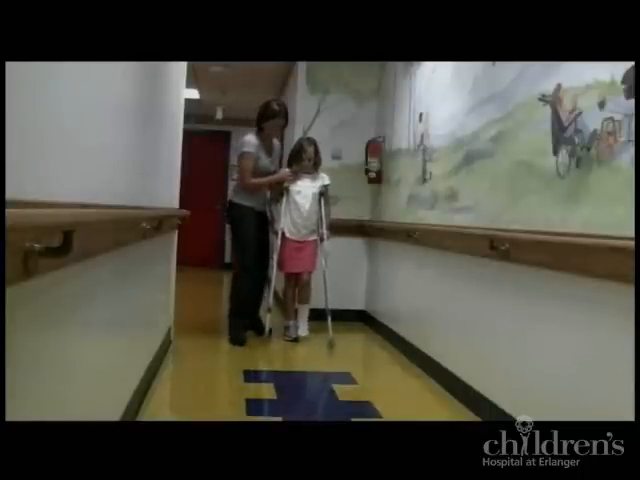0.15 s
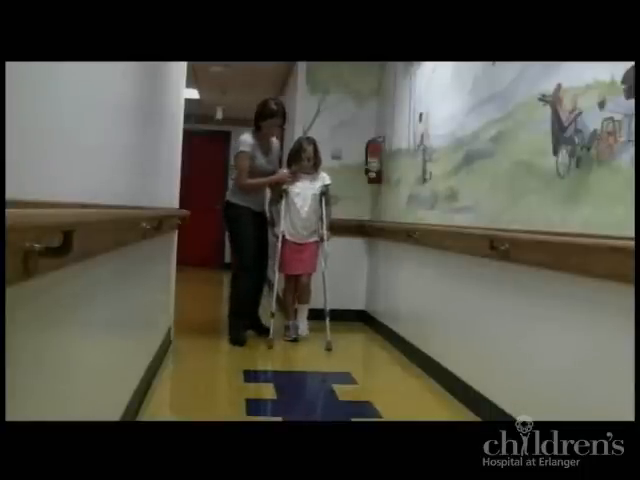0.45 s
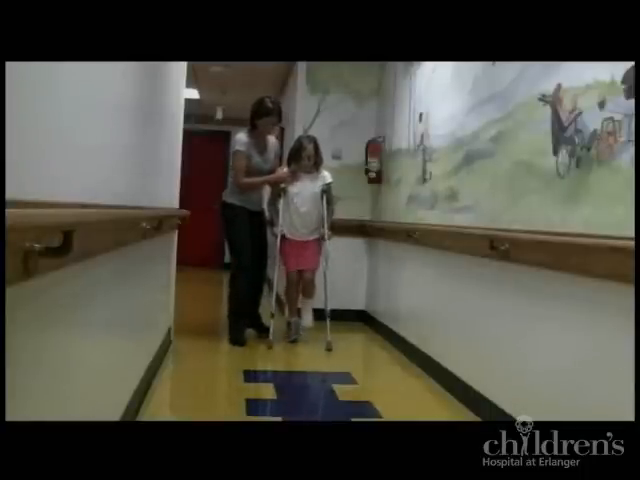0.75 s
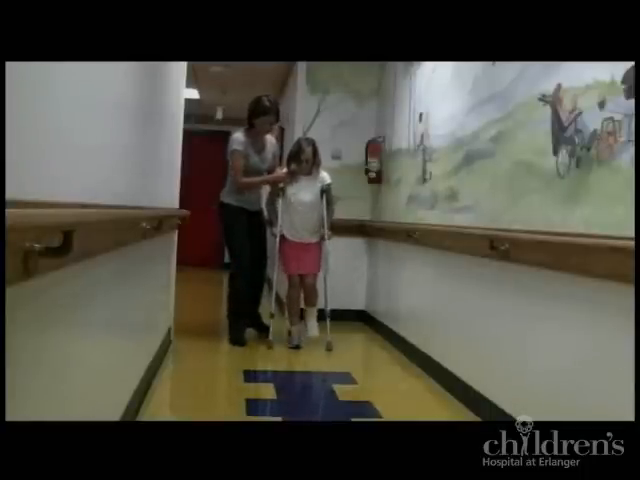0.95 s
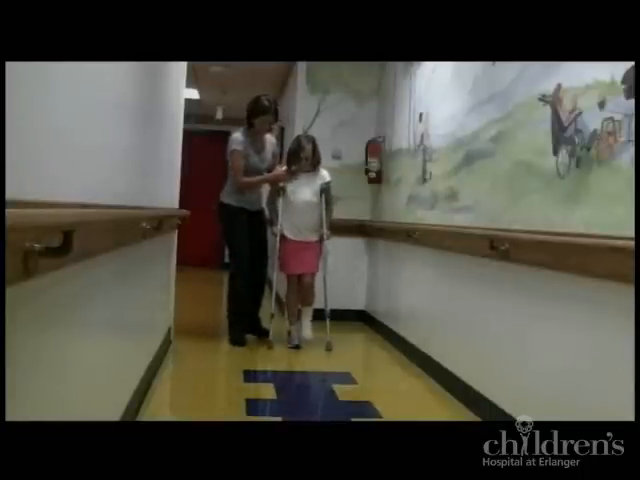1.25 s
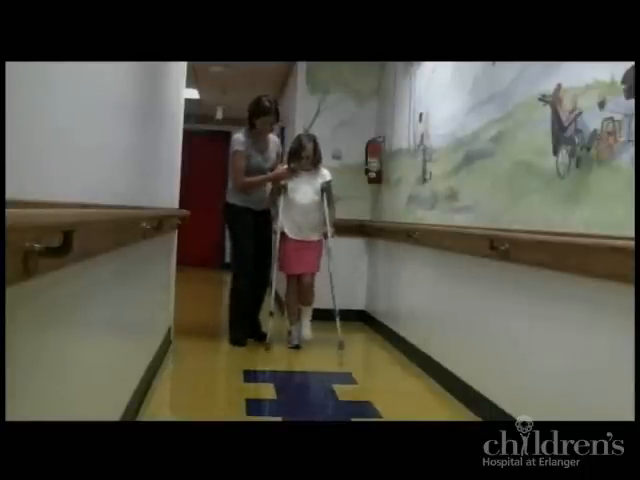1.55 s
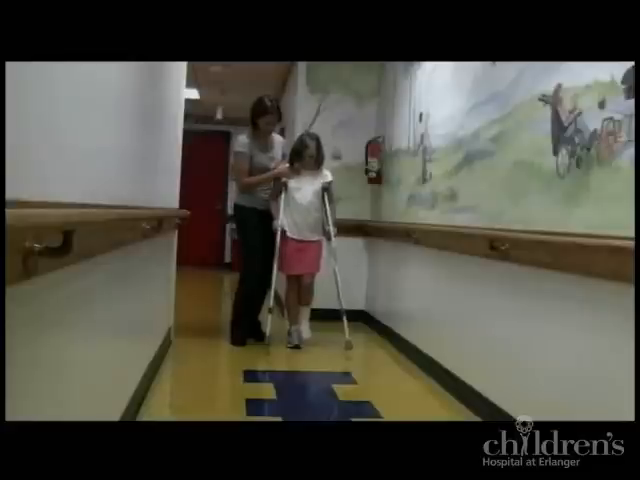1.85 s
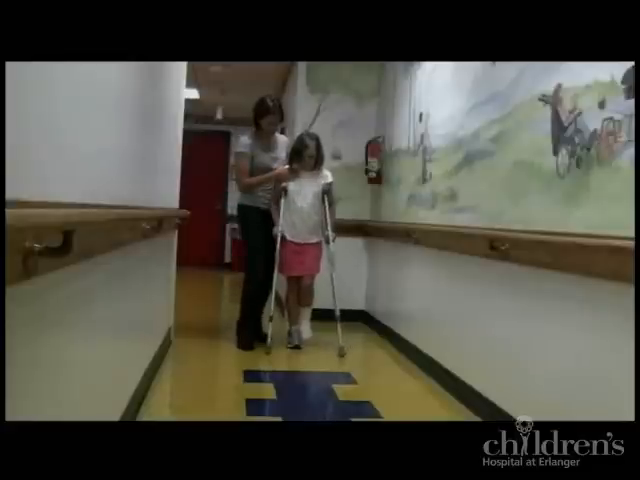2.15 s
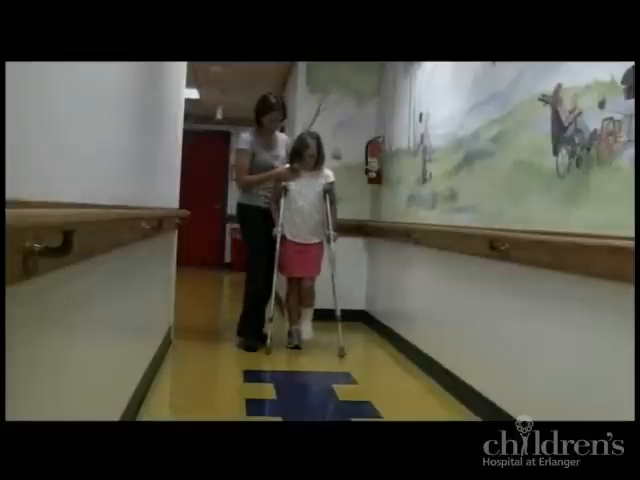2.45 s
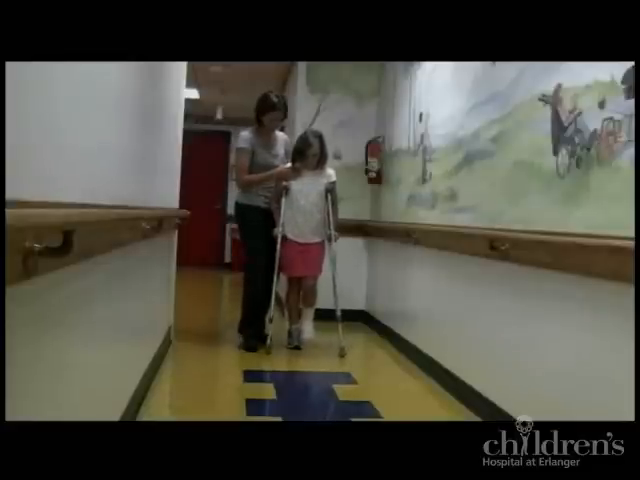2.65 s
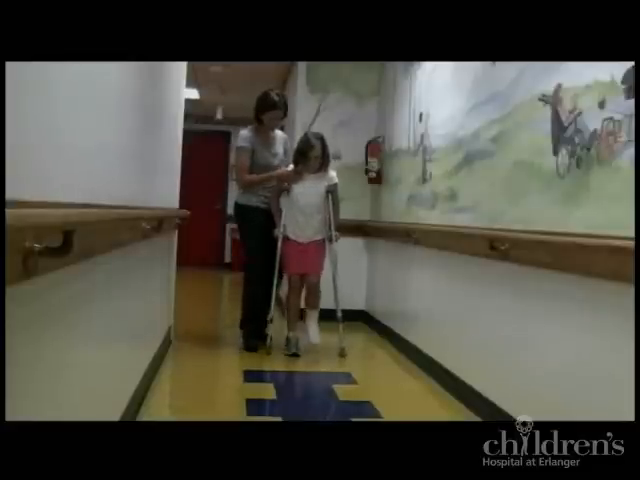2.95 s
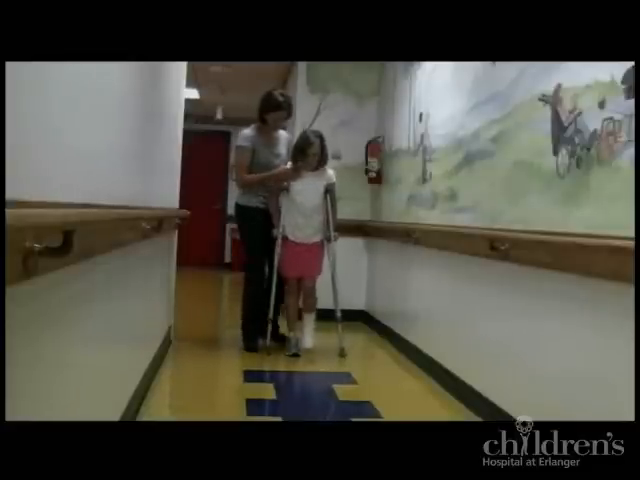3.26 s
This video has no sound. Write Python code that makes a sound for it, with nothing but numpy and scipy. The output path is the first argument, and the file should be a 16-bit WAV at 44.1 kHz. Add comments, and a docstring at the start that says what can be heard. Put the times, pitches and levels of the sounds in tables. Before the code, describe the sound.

Metal crutches clack and thud on a hard corridor floor over a faint ventilation hum.

```python
"""Two rubber crutch tips thud on a hard corridor floor, with loose joints and shoes clacking between.
A child walks slowly on metal crutches, a helper beside her; one microphone stands down the corridor.
Thuds and clacks are bursts of gritty noise, coloured by resonances; a thump and floor boom add low sines.
Cloth rustles as sparse noise grains and soles squeak as gliding tones, each with the corridor around it.
Behind them lie shaped ventilation noise and two wavering hum tones."""
import sys
import numpy as np
from scipy import signal
from scipy.fft import rfft, irfft
from scipy.io import wavfile
from scipy.ndimage import uniform_filter1d

SR = 44100
rng = np.random.default_rng(int(sys.argv[2]) if len(sys.argv) > 2 else 0)


def bounce(signal):
    """Save signal as a 16-bit WAV file at the path given by the first command-line argument."""
    frames = np.transpose(np.atleast_2d(signal))
    limited = np.clip(frames, -1, 1)
    pcm = np.round(limited * 32767).astype(np.int16)
    wavfile.write(sys.argv[1], SR, pcm)


N = 149940  # length in samples, 3.4 s


def amp(db):
    """Decibels to gain."""
    return 10 ** (np.asarray(db) / 20)


def unit(x):
    """Scales to rms 1."""
    return x / np.sqrt(np.mean(x ** 2) + 1e-20)


def read(points, hz):
    """Reads a table on a log-frequency axis."""
    f, value = np.transpose(points)
    return np.interp(np.log(hz + 1), np.log(f + 1), value)


def add(mix, start_s, sound):
    """Mixes a sound in at a time, cutting what runs past the end."""
    part = mix[max(round(start_s * SR), 0):][:len(sound)]
    part += sound[:len(part)]


def bins(size=4096):
    """Frequencies of the filter grid, in Hz."""
    return np.fft.rfftfreq(size, 1 / SR)


def colour(x, gain):
    """Minimum-phase filter with the given gain on the filter grid, so nothing sounds before its cause."""
    both_sides = np.r_[gain, gain[-2:0:-1]]
    log_gain = np.log(np.maximum(both_sides, 1e-5))
    taps = np.fft.ifft(np.exp(np.conj(signal.hilbert(log_gain)))).real
    return signal.fftconvolve(x, taps[:len(gain)])


def peak(hz, width_hz):
    """Gain of one resonance on the filter grid."""
    return 1 / np.sqrt(1 + (2 * (bins() - hz) / width_hz) ** 2)


def drift(size, rate_hz):
    """Slow random wander of rms 1."""
    hz = np.fft.rfftfreq(size, 1 / SR)
    spectrum = rfft(rng.standard_normal(size)) * np.exp(-(hz / rate_hz) ** 2)
    return unit(irfft(spectrum, size))


def evenly(x, envelope, count=6):
    """Shapes noise by an envelope while keeping its spectrum even; energy 1."""
    for _ in range(count):
        z = rfft(x * envelope)
        x = irfft(z / (abs(z) + 1e-12), len(x))  # flat spectrum
        x = x / np.sqrt(abs(uniform_filter1d(x ** 2, size=64)) + 1e-30)  # flat level
    shaped = x * envelope
    return shaped / np.linalg.norm(shaped)


def contact(length_s, rise_s, fall_s, size=2048):
    """A gritty burst of tiny impacts as two surfaces settle against each other."""
    t = np.arange(size) / SR
    envelope = (1 - np.exp(-t / rise_s)) * np.exp(-np.maximum(t - length_s, 0) / fall_s)
    grit = amp(3 * drift(size, 515))  # level wanders by 3 dB rms, up to about 515 Hz
    return evenly(rng.standard_normal(size), envelope * grit)


# how long the corridor rings in each band: pitch_hz, t60_s (time to fall 60 dB)
CORRIDOR_T60 = [(150, 0.97), (500, 0.63), (1500, 0.47), (4000, 0.37), (8000, 0.38), (12000, 0.36)]
EARLY_T60_S = 0.16
EARLY_DB, TAIL_DB, DIRECT_DB = -0.5, -8.5, -4.5


def corridor(x, size=32768):
    """Direct sound, dense reflections from the near walls, and a tail whose decay depends on pitch."""
    t = np.arange(size) / SR
    near_walls = (1 - np.exp(-t / 0.00097)) * amp(-60 * t / EARLY_T60_S)
    early = evenly(rng.standard_normal(size), near_walls, count=1)
    hz, when_s, z = signal.stft(rng.standard_normal(size), SR, nperseg=256)
    decay = amp(-60 * when_s / read(CORRIDOR_T60, hz)[:, None])
    tail = signal.istft(z * decay, SR)[1][:size] * (1 - np.exp(-t / 0.014))
    response = amp(EARLY_DB) * early + amp(TAIL_DB) * tail / np.linalg.norm(tail)
    response[0] += amp(DIRECT_DB)
    return signal.fftconvolve(x, response)


# spectrum shape of the ventilation: pitch_hz, level_db (relative)
AIR_COLOUR = [(15, -56), (25, -15), (64, -12), (102, -5), (211, 0), (364, -6.5), (485, -4), (953, -13.5),
              (1140, -18.5), (1560, -22), (2990, -31), (4900, -31), (12500, -40.5), (16200, -73),
              (22000, -120)]
AIR_DB = -48.5  # rms


def ventilation():
    """Steady air noise, random in phase and weighted towards the lows."""
    gain = amp(read(AIR_COLOUR, np.fft.rfftfreq(N, 1 / SR)))
    return amp(AIR_DB) * unit(irfft(rfft(rng.standard_normal(N)) * gain, N))


# mains hum of the building: pitch_hz, level_db (rms before the waver)
HUM_TONES = [(120, -54.5), (240, -56)]


def hum():
    """Steady mains tones, each wavering slightly in level."""
    t = np.arange(N) / SR
    sound = np.zeros(N)
    for hz, db in HUM_TONES:
        waver = 1 + 0.13 * drift(N, 8.1)
        sound += amp(db) * np.sqrt(2) * waver * np.sin(2 * np.pi * (hz * t + rng.random()))
    return sound


# rise and fall of the rustle: start_s, level_db
RUSTLE_LEVEL = [(0, -47.5), (0.159, -74), (.25, -70), (.36, -64.5), (.62, -53.5), (.80, -55), (.86, -45.5),
                (.91, -51), (.97, -59), (1.3, -60.5), (1.72, -72.5), (1.88, -57), (2.04, -57), (2.17, -66),
                (2.55, -60), (2.72, -56), (2.849, -54.5), (2.92, -49), (3.02, -56.5), (3.4, -67)]
# colour of cloth and soles: pitch_hz, level_db (relative)
CLOTH_COLOUR = [(200, -14.5), (700, 7), (1200, 8), (2000, 3.5), (3200, 3.5), (5000, -4.5), (8000, -7.5),
                (12000, -18)]
GRAINS_PER_S, GRAIN_SPREAD_DB = 2500, 2.5


def rustle():
    """Sparse random grains of cloth and sliding soles, swelling as the legs swing."""
    present = rng.random(N) < GRAINS_PER_S / SR
    strength = amp(GRAIN_SPREAD_DB * np.minimum(rng.exponential(1, N), 4))
    grains = rng.standard_normal(N) * strength * present
    sound = unit(corridor(colour(grains, amp(read(CLOTH_COLOUR, bins()))))[:N])
    return sound * amp(np.interp(np.arange(N) / SR, *np.transpose(RUSTLE_LEVEL)))


# faint squeaks of the soles: start_s, length_s, start_hz, end_hz, level_db
SOLE_SQUEAKS = [(0.648, .11, 1080, 1178, -60), (.70, 0.12, 1458, 1510, -60), (0.812, 0.156, 859, 927, -52)]


def squeak(length_s, start_hz, end_hz, db):
    """A thin wavering tone that glides up, swells and fades, with a little of the corridor around it."""
    u = np.linspace(0, 1, int(length_s * SR))
    glide = start_hz + (end_hz - start_hz) * np.sin(np.pi / 2 * u)
    hz = glide * (1 + 0.023 * drift(len(u), 155))
    swell = np.sqrt(2 * abs(np.sin(np.pi * u)))
    tone = amp(db) * swell * np.sin(2 * np.pi * np.cumsum(hz) / SR)
    sound = amp(-4) * corridor(tone)
    add(sound, 0, tone)
    return sound


# clacks of loose joints and shoes: start_s, level_db (relative), length_s,
# tilt_db (brightness per octave), ring_db (metal), knock_hz, knock_db
JOINT_CLACKS = [(0.3773, -13.5, 0.0039, -1, -11, 1210, 6.5), (0.486, -2, 0.011, 1, -26, 1940, 0.5),
                (0.4988, -4.5, 0.013, -0.5, -24, 4060, 2.5), (1.3693, -1.5, .005, 0.5, -3, 1480, 2.5),
                (2.209, -13.5, 0.0066, -0.5, -27, 1150, 3), (2.233, -18, 0.017, -2.5, 0, 1620, 6),
                (2.2850, -1.5, 0.0054, -0.1, -25, 1190, 3), (2.354, -14.5, 0.0074, -2, -14, 1960, 3),
                (2.3804, -12, 0.0023, 0, -13, 2430, 13)]
# shared colour of a clack: pitch_hz, level_db (relative)
HARD_COLOUR = [(60, -8.5), (400, -5.5), (800, -2), (1200, 0), (2200, 0), (3200, -1), (5000, -1),
               (6000, 0.5), (6600, 0.5), (7400, -4), (9800, -7.5), (10800, -4.5), (12500, -12.5)]
# resonances of the crutch frame: pitch_hz, width_hz, level_db (relative)
FRAME_RINGS = [(1030, 120, 1), (1360, 70, 8), (1615, 60, 12), (2300, 250, 3), (2700, 80, 3),
               (3500, 110, 10), (4820, 170, 9), (6240, 130, 5)]
CLACK_DB, CLACK_RISE_S, CLACK_FALL_S = 9.5, 0.00088, 0.002


def clack(db, length_s, tilt_db, ring_db, knock_hz, knock_db):
    """A short hard chatter with one broad knock, which may also ring the metal frame."""
    ring_power = sum((amp(level + ring_db) * peak(hz, width)) ** 2 for hz, width, level in FRAME_RINGS)
    knock = amp(knock_db) * peak(knock_hz, knock_hz / 5.2)
    octaves = np.log2(np.maximum(bins(), 500) / 3000)
    level_db = CLACK_DB + db + read(HARD_COLOUR, bins()) + tilt_db * octaves
    gain = amp(level_db) * np.sqrt(1 + ring_power + knock ** 2)
    return corridor(colour(contact(length_s, CLACK_RISE_S, CLACK_FALL_S), gain))


# small ticks of clothes and cuffs: start_s, level_db (relative, as for clacks)
CLOTH_TICKS = [(0.002, -31.5), (0.032, -47), (0.086, -30.5), (0.26, -35), (0.288, -32), (0.322, -28.5),
               (0.356, -31), (0.452, -29.5), (0.560, -23.5), (1.795, -34.5), (1.944, -29.5), (2.555, -31.5),
               (2.875, -30.5)]


def tick(db):
    """A faint, dull relative of the clack, with hardly any metal in it."""
    return clack(db, length_s=0.004, tilt_db=-4.3, ring_db=-33, knock_hz=3470, knock_db=2)


# crutch tips landing: start_s, level_db (relative), second_s (second contact, after the first), second_db,
# tube_hz, tube_db, thump_hz, knock_hz, tilt_db (hardness per octave), top_hz (upper band edge), boom_db
TIP_THUDS = [(0.9935, 0, .0060, -5, 2590, 10, 295, 640, -1, 12000, 5),
             (3.0548, 2, .0072, -6.5, 4360, 5, 261.5, 400, -0.22, 9700, 2)]
# shared colour of a landing: pitch_hz, level_db (relative)
LANDING_COLOUR = [(35, -32), (90, -12), (150, -7), (280, 2.5), (420, 3), (800, -1.5), (1200, -4),
                  (2200, -5.5), (3600, -9), (5200, -8.5), (7000, -19.5), (9000, -21.5), (12000, -34.5)]
# low ring of floor and corridor: pitch_hz, level_db (relative), t60_s
FLOOR_BOOM = [(191.3, -28, 0.4), (275, -33, 0.61), (391.3, -32, 0.4), (416, -28, 0.31), (468, -25.5, 0.29),
              (586, -29, 0.32), (742, -26, 0.2), (779, -35, 0.22), (957, -40, 0.43)]
THUD_DB, THUD_FALL_S, TUBE_WIDTH_HZ = 18, 0.0015, 340
THUMP_DB, THUMP_T60_S, LOW_CUT_HZ = -14.5, 0.12, 250


def landing(second_s, second_db, tube_hz, tube_db, knock_hz, tilt_db, top_hz):
    """Two quick contacts knock and shake the tube; each landing has its own tilt and upper band edge."""
    force = np.zeros(SR // 10)
    add(force, 0, contact(0, 0.00029, THUD_FALL_S))
    add(force, second_s, amp(second_db) * contact(0, 0.000547, THUD_FALL_S * 2))
    tube = amp(tube_db) * peak(tube_hz, TUBE_WIDTH_HZ)
    knock = amp(4) * peak(knock_hz, knock_hz / 4.7)
    octaves = np.log2(np.clip(bins(), 300, 2000) / 1000)
    tilt_and_edge = amp(tilt_db * octaves) / np.sqrt(1 + (bins() / top_hz) ** 20)
    resonance = np.sqrt(1 + tube ** 2 + knock ** 2)
    gain = amp(THUD_DB + read(LANDING_COLOUR, bins())) * tilt_and_edge * resonance
    return corridor(colour(force, gain))


def floor_response(size, thump_hz, boom_db):
    """The loaded crutch thumps at one pitch while floor and corridor boom as decaying modes."""
    t = np.arange(size) / SR
    thump = amp(THUMP_DB - 60 * t / THUMP_T60_S) * np.sin(2 * np.pi * thump_hz * t)
    boom = np.zeros(size)
    for hz, level, t60_s in FLOOR_BOOM:
        boom += amp(level - 60 * t / t60_s) * np.sin(2 * np.pi * (hz * t + rng.random()))
    low = thump + amp(boom_db) * boom * (1 - np.exp(-t / 0.014))
    return signal.sosfilt(signal.butter(2, LOW_CUT_HZ, "high", fs=SR, output="sos"), low)


def thud(db, second_s, second_db, tube_hz, tube_db, thump_hz, knock_hz, tilt_db, top_hz, boom_db):
    """One crutch tip landing: the knocking contacts plus the low answer of crutch and floor."""
    sound = landing(second_s, second_db, tube_hz, tube_db, knock_hz, tilt_db, top_hz)
    return amp(db) * (sound + floor_response(len(sound), thump_hz, boom_db))


def scene():
    """All sources at one microphone down the corridor."""
    mix = ventilation() + hum() + rustle()
    events = [(SOLE_SQUEAKS, squeak), (CLOTH_TICKS, tick), (JOINT_CLACKS, clack), (TIP_THUDS, thud)]
    for table, source in events:
        for start_s, *settings in table:
            add(mix, start_s, source(*settings))
    return mix[None]


def record(dry):
    """The recorder's band limit: a linear-phase low-pass at 12750 Hz."""
    taps = signal.firwin(301, 12750, window=("kaiser", 8), fs=SR)
    return signal.oaconvolve(dry, taps[None], "same")


dry = scene()
out = record(dry)
bounce(out)
```